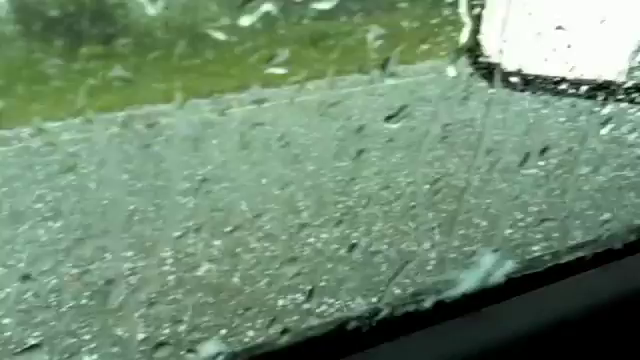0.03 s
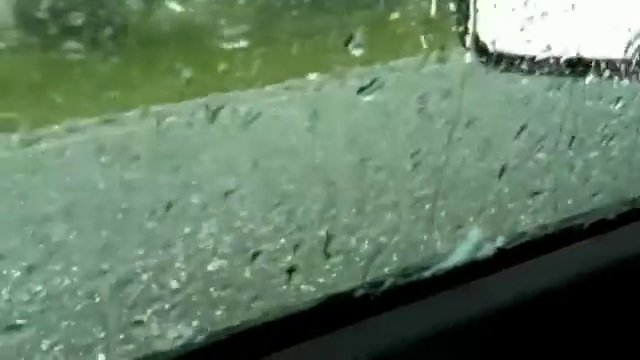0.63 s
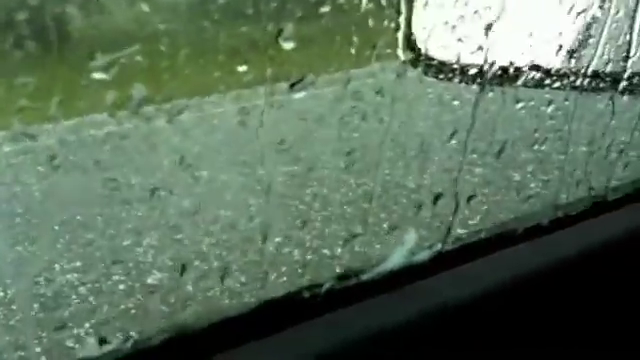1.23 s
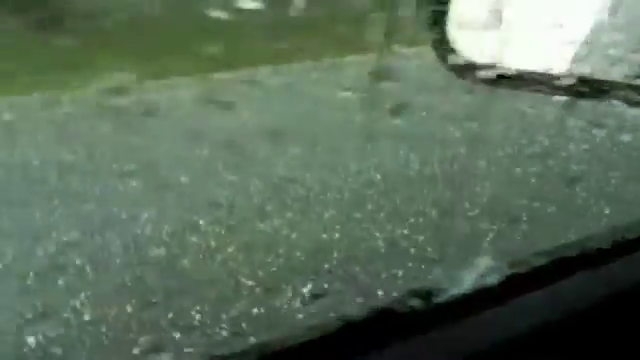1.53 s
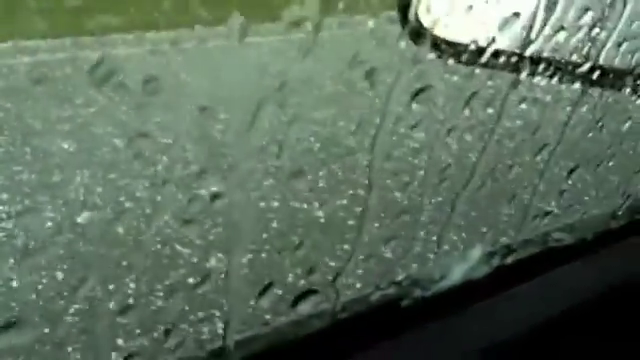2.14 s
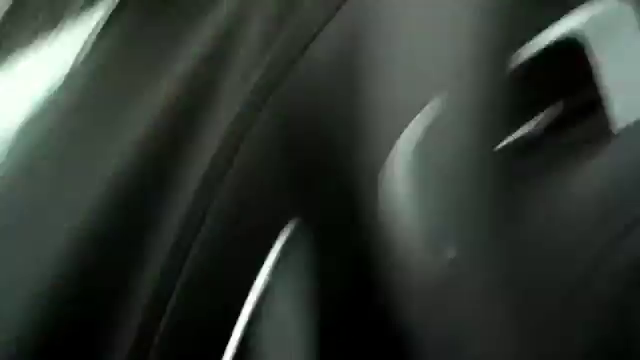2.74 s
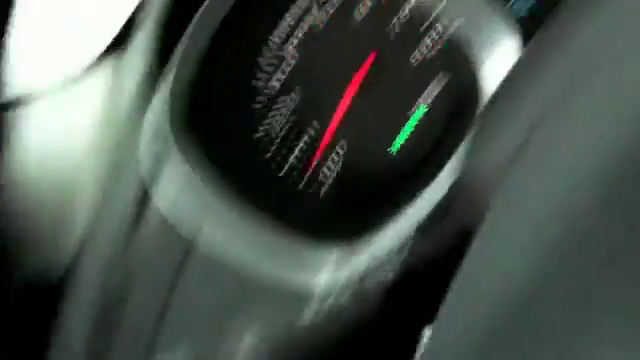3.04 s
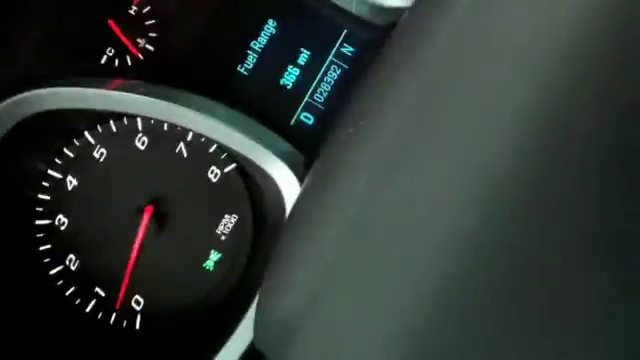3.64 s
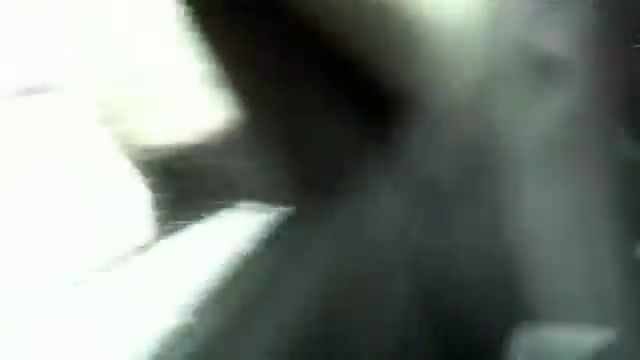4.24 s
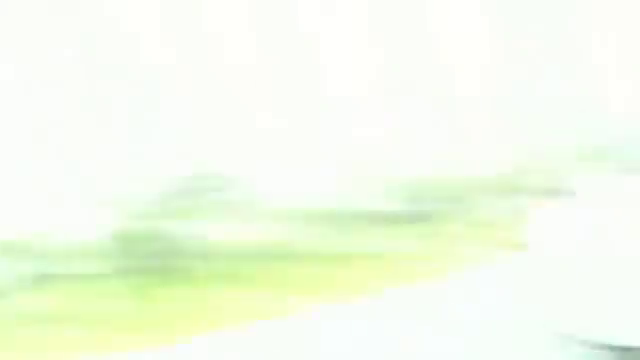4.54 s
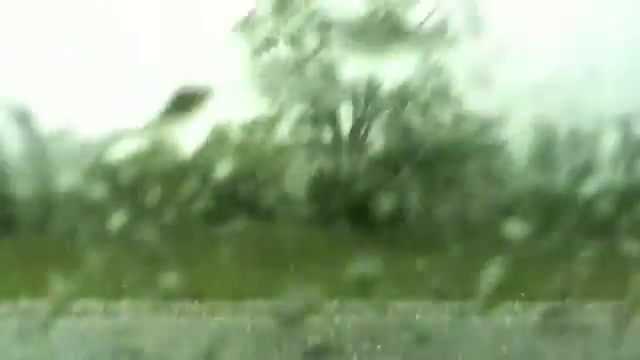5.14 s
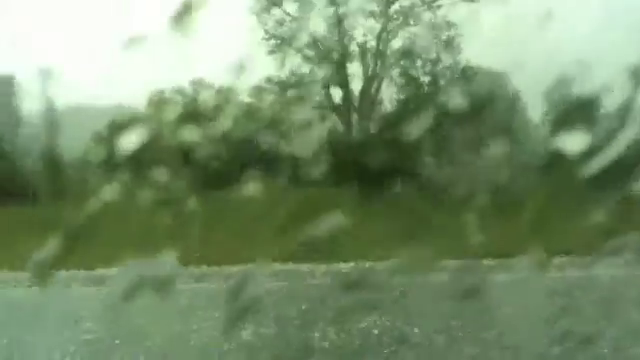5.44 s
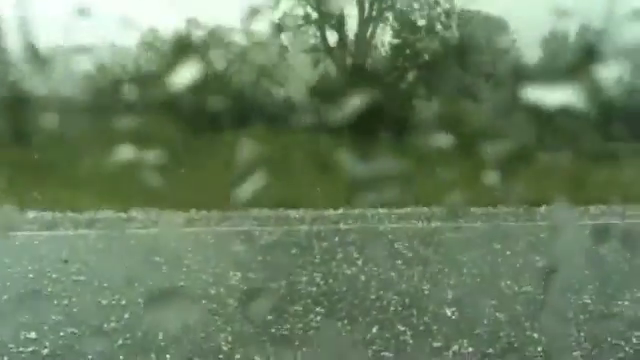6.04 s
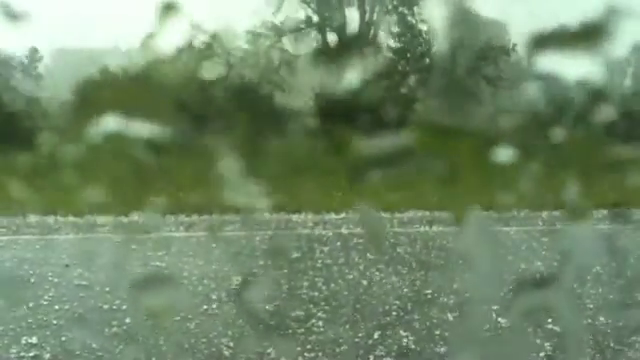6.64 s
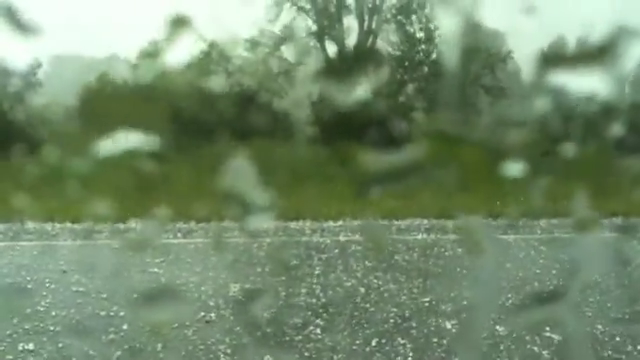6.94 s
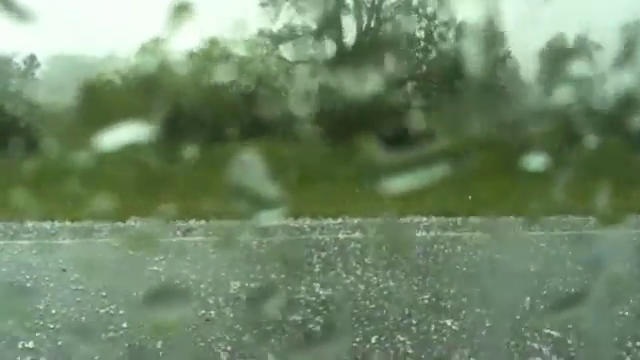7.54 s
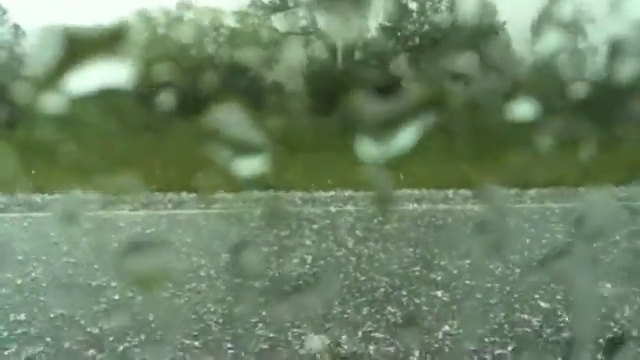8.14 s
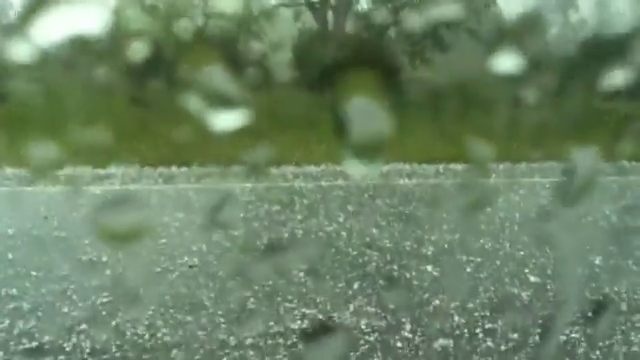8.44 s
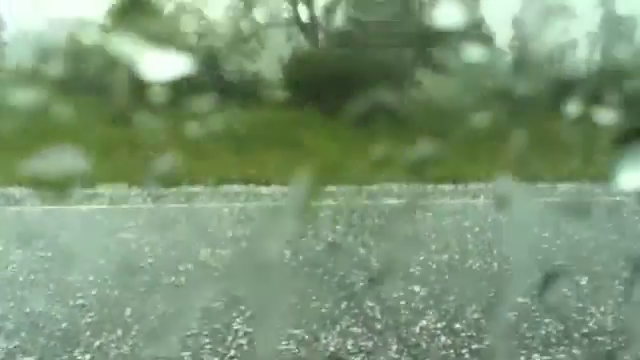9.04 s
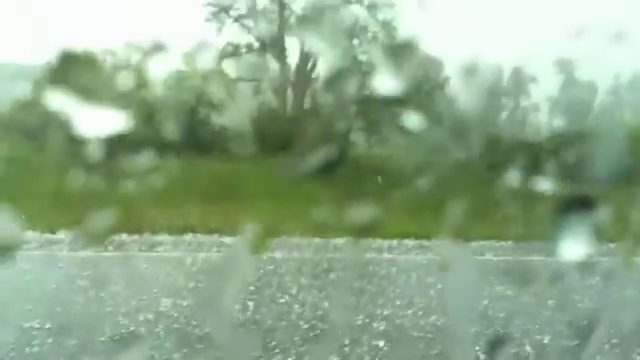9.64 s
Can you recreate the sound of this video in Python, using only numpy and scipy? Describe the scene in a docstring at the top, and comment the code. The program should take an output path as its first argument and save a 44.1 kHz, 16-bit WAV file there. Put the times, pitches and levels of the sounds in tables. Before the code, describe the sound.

Hail falls on a stopped car, heard from the driver's seat inside the closed cabin. A low, muffled wash of rain begins at about 0.1 seconds, with a faint hiss of drops and a light patter of small pellets, and stays steady throughout. From 0.2 seconds, hailstones thud and clang on the steel roof, many per second at irregular intervals, each ringing briefly with a small splash of ice. Sharp cracks and clicks from stones hitting the windows and roof cut through. Some stones shatter, and a thinner tick from a chip follows right after. Bigger stones add hollow knocks and clacks on the roof panel, scattered all the way through, with the hardest near 7.9 seconds and other strong ones around 5.8, 8.5 and 9.7 seconds. The hail keeps going until the end, at about 10 seconds.

```python
"""Hail on a stopped car, heard from the driver's seat.
A low wash of rain sets in first, with a faint hiss of drops and a patter of small pellets.
From 0.2 s on, stones thud and clang on the steel roof, spraying ice. Sharp cracks come from
stones on the windows and from the hard first click of a few roof hits.
Some stones shatter, and a chip lands just after. Big ones knock on the panel, hardest near 7.9 s."""
import sys
import numpy as np
from scipy import signal
from scipy.fft import rfft, irfft
from scipy.io import wavfile
from scipy.ndimage import uniform_filter1d

SR = 44100
rng = np.random.default_rng(int(sys.argv[2]) if len(sys.argv) > 2 else 0)


def wav_out(sig):
    """Save sig, one row per channel (or a flat mono array), as 16-bit PCM at SR to the path in sys.argv[1]."""
    wavfile.write(sys.argv[1], SR, np.round(np.clip(np.atleast_2d(sig).T, -1, 1) * 32767).astype(np.int16))


N = 431298
START_S = .122
THUD_EDGE_HZ, CRACK_EDGE_HZ = 526, 3260
SIZE = 8192  # samples per impact
T = np.arange(SIZE) / SR
HZ = np.fft.rfftfreq(SIZE, 1 / SR)


def gain_of(db):
    """Decibels to amplitude."""
    return 10 ** (np.asarray(db) / 20)


def unit_rms(x):
    """Scales to rms 1."""
    return x / np.sqrt(np.mean(x ** 2))


def decay(t60_s):
    """Falls 60 dB in t60_s."""
    return np.exp(-np.log(1000) * T / t60_s)


def curve_db(points, hz):
    """Interpolates a spectrum over log frequency."""
    point_hz, level_db = np.transpose(points)
    return np.interp(np.log(hz + 1), np.log(point_hz), level_db)


def add(mix, start_s, sound):
    """Mixes a sound in at start_s."""
    part = mix[max(round(start_s * SR), 0):][:len(sound)]
    part += sound[:len(part)]


def causal(gain):
    """Minimum-phase response: nothing sounds before the blow."""
    cepstrum = irfft(np.log(np.maximum(gain, gain_of(-100))))
    cepstrum[..., 1:SIZE // 2] *= 2
    cepstrum[..., SIZE // 2 + 1:] = 0
    return np.exp(rfft(cepstrum))


def grains(spread_db):
    """Countless tiny impacts: most faint, a few strong."""
    return rng.standard_normal(N) * gain_of(spread_db * np.minimum(rng.exponential(1, N), 5))


def lumps(depth_db, length, width):
    """Random gain, smoothed over width samples."""
    return gain_of(depth_db * unit_rms(uniform_filter1d(rng.standard_normal(length), size=width)))


# Rain spectrum inside the cabin: freq_hz, level_db
RAIN_SPECTRUM = [(60, -14.5), (160, 7.5), (450, -5.5), (1700, -14), (2800, -50), (15000, -85)]


def rain(level_db=-37):
    """Drops outside merge into a grainy wash, muffled by the cabin."""
    colour = gain_of(curve_db(RAIN_SPECTRUM, np.fft.rfftfreq(N, 1 / SR)))
    wash = irfft(rfft(grains(spread_db=3)) * colour, N)
    return gain_of(level_db) * unit_rms(wash) * (np.arange(N) > START_S * SR)


def drizzle(level_db=-56):
    """Fine drops on the windows: a faint, grainy hiss."""
    rolloff_db = -8 * np.log2(1 + HZ / CRACK_EDGE_HZ)
    colour = causal(gain_of(curve_db(SPRAY_SPECTRUM, HZ) + rolloff_db))
    hiss = signal.oaconvolve(grains(spread_db=5), irfft(colour))[:N]
    return gain_of(level_db) * unit_rms(hiss) * (np.arange(N) > START_S * SR)


# Hiss of ice breaking up: freq_hz, level_db
SPRAY_SPECTRUM = [(1500, -49), (3000, 21), (5500, 19), (8500, 16.5), (12000, 9), (15500, 7.5)]


def spray(stones, gain_db, hardness_slope, scatter_db, delay_s, rise_s, t60_s, grain_db, clump_db):
    """Harder stones burst into more fine grains, which skitter in clumps."""
    power = np.zeros(N)
    envelope = (1 - np.exp(-T / rise_s)) * decay(t60_s)
    draws = rng.standard_normal((len(stones), 2))
    for (start_s, strength_db, hardness_db), (luck, lag) in zip(stones, draws):
        gain = gain_of(gain_db + strength_db + hardness_slope * hardness_db + scatter_db * luck)
        add(power, start_s + delay_s * abs(lag), (gain * envelope) ** 2)
    clumps = lumps(clump_db, N, width=110)
    colour = causal(gain_of(curve_db(SPRAY_SPECTRUM, HZ)))
    hiss = signal.oaconvolve(grains(grain_db) * clumps, irfft(colour))[:N]
    return np.sqrt(power) * unit_rms(hiss)


# Struck car body from inside: freq_hz, level_db
BODY_SPECTRUM = [(60, -42), (100, -21.5), (160, -5), (260, -4), (460, 0.5), (750, 4), (1150, -1), (1650, 0),
                 (2250, -8), (3100, -7), (4900, -14.5), (7000, -25.5), (15500, -39.5)]


def body_bands():
    """Splits the body's response into thud, clang and crack."""
    low, not_high = (1 / (1 + (HZ / edge_hz) ** 6) for edge_hz in (THUD_EDGE_HZ, CRACK_EDGE_HZ))
    split = np.sqrt([low, (1 - low) * not_high, 1 - not_high])
    return causal(split * gain_of(curve_db(BODY_SPECTRUM, HZ)))


def panel_spot(tilt_db_per_oct, uneven_db=3, count=64):
    """Each spot favours its own modes; contact time tilts them."""
    hz = np.geomspace(HZ[1], HZ[-1], count)
    level_db = uneven_db * rng.standard_normal(count) + tilt_db_per_oct * np.log2(hz / THUD_EDGE_HZ)
    return causal(gain_of(curve_db(np.column_stack([hz, level_db]), HZ)))


def blows(stones, response):
    """Harder stones have shorter contact, so less thud. Rows: start_s, thud_db, clang_db, crack_db."""
    start_s, strength_db, hardness_db = np.transpose(stones)
    offset_db, slope = np.transpose(response)
    return np.column_stack([start_s, strength_db[:, None] + offset_db + hardness_db[:, None] * slope])


def strikes(rows, ring_t60_s, rise_s, contact, burst, burst_t60_s, cabin, grit_db):
    """Per blow: contact pulse, short burst, dense panel waves and a weak cabin echo."""
    out, bands = np.zeros(N), body_bands()
    ring, echo = decay(np.c_[ring_t60_s]), decay(np.c_[STEEL_T60_S])
    fall = np.sqrt(ring ** 2 + (burst * decay(burst_t60_s)) ** 2 + (cabin * echo) ** 2)
    brightness_db = rows[:, 3] - rows[:, 1]
    tilts_db_per_oct = .32 * (brightness_db - brightness_db.mean())
    for (start_s, *levels_db), tilt in zip(rows, tilts_db_per_oct):
        attack_speed = gain_of(levels_db[1] - rows[:, 2].mean())  # stronger clangs peak sooner
        envelope = fall * (1 - np.exp(-T / rise_s * attack_speed))
        band_norm = np.linalg.norm(envelope, axis=1, keepdims=True)
        grit = unit_rms(lumps(grit_db, SIZE, width=120))  # shattering ice roughens the ring
        drive = envelope * grit * rng.standard_normal(SIZE)
        drive[:, :1] += contact * band_norm
        sound = irfft(rfft(drive) * bands * panel_spot(tilt))
        sound *= band_norm / np.linalg.norm(sound, axis=1, keepdims=True)
        add(out, start_s, gain_of(levels_db) @ sound)
    return out


# Steel ring for thud, clang, crack: t60_s
STEEL_T60_S = [0.27, 0.17, 0.14]
# Steel response for thud, clang, crack: offset_db, hardness_slope
STEEL_RESPONSE = [(1.1, -0.73), (2.5, -0.27), (-6.5, 0.2634)]


def clangs(stones):
    """The blow spreads through the steel sheet and rings on."""
    return strikes(blows(stones, STEEL_RESPONSE), STEEL_T60_S, rise_s=.0022, contact=.2,
                   burst=1.05, burst_t60_s=.055, cabin=.14, grit_db=2.5)


# Hard-surface ring for thud, clang, crack: t60_s
HARD_T60_S = [0.045, 0.087, 0.09]


def clicks(rows):
    """Hard ice on a hard surface: a sharp click, a brief ring."""
    return strikes(rows, HARD_T60_S, rise_s=.00012, contact=.5,
                   burst=3.1, burst_t60_s=.016, cabin=.11, grit_db=2)


def pellets(count=130, strength_db=-35, hardness_db=3.5, spread_db=3):
    """Light stones drum on the roof at random."""
    start_s = rng.uniform(START_S, N / SR, count)
    traits_db = np.array([strength_db, hardness_db]) + spread_db * rng.standard_normal((count, 2))
    return clangs(np.column_stack([start_s, traits_db]))


# Chip relative to its parent stone: thud_db, clang_db, crack_db
CHIP_OFFSET_DB = [-9.5, -9, -8]


def chips(share=.54, max_hop_s=.075):
    """Some stones shatter on the roof; a thinner-sounding chip lands just after."""
    hop, luck = rng.random((len(ROOF_STONES), 2)).T
    rows = blows(ROOF_STONES, STEEL_RESPONSE)
    rows[:, 0] += max_hop_s * hop
    rows[:, 1:] += CHIP_OFFSET_DB
    return clicks(rows[luck < share])


# Big stones mid-panel: start_s, pitch_hz, level_db
BIG_STONES = [(0.239, 55, -12), (0.748, 750, 3), (0.75, 1590, 1.5), (1.048, 1575, 4.5), (1.076, 226, 3),
              (1.592, 340, -1), (2.231, 1890, -5), (2.25, 410, 5.5), (2.62, 324, 4.5), (2.939, 1124, -1.5),
              (3.227, 3100, -6.5), (3.432, 744, 6), (3.637, 530, 4.5), (4.692, 196, 5.5), (5.228, 528, 6),
              (5.743, 563, 4), (5.826, 329, 7), (6.246, 418, 6), (6.587, 1114, -1), (6.67, 1476, -5),
              (6.749, 3000, -5), (7.898, 240, 1.5), (7.94, 423, 12), (7.943, 135, 1.5), (8.214, 502, 5),
              (8.435, 404, -14), (8.539, 378, 7.5), (8.559, 553, 4), (8.697, 408, 2.5), (9.738, 410, 8)]


def knocks(t60_s=.032, rise_s=.0044, spread=.278, crowded_hz=1200, modes=7):
    """One low mode gives a hollow tonk; higher up, modes crowd into a clack. Both linger faintly."""
    out = np.zeros(N)
    envelope = np.hypot(decay(t60_s), .066 * decay(STEEL_T60_S[1])) * (1 - np.exp(-T / rise_s))
    draws = rng.uniform(-1.06, 1, (len(BIG_STONES), 2, modes))
    for (start_s, pitch_hz, level_db), (jitter, phase) in zip(BIG_STONES, draws):
        modes_hz = pitch_hz * (1 + spread * (np.linspace(-1, 1, modes) + jitter / modes))
        clack = np.sin(2 * np.pi * np.outer(T, modes_hz) + np.pi * phase).sum(1) / np.sqrt(modes)
        tonk = np.sin(2 * np.pi * pitch_hz * T)
        clack_share = pitch_hz ** 2 / (pitch_hz ** 2 + crowded_hz ** 2)
        tone = np.sqrt(1 - clack_share) * tonk + np.sqrt(clack_share) * clack
        add(out, start_s, gain_of(level_db) * envelope * tone)
    return out


def snaps(stones, gain_db=9.5, t60_s=.008, rise_s=.0003, base_hz=1850, sweep_s=.0006):
    """The surface flexes, higher under harder stones; short waves arrive first, so the pitch dives."""
    out = np.zeros(N)
    envelope = decay(t60_s) * (1 - np.exp(-T / rise_s))
    cycles = np.cumsum(base_hz * (1 + np.exp(-T / sweep_s))) / SR
    for (start_s, strength_db, hardness_db), place in zip(stones, rng.uniform(-1.07, 1, len(stones))):
        shift_oct = .025 * hardness_db + .45 * place
        flex = np.sin(2 * np.pi * cycles * 2 ** shift_oct)
        add(out, start_s, gain_of(gain_db + strength_db) * envelope * flex)
    return out


# Hard-surface response for thud, clang, crack: offset_db, hardness_slope
HARD_RESPONSE = [(1, -0.1), (5, -0.066), (-2.5, -0.083)]
# Sharp cracks: stones on the windows, and the hard first click of a few roof hits:
# start_s, strength_db, hardness_db
SHARP_CRACKS = [(0.2273, -15.5, 14), (0.403, -17.5, 3), (0.41, -13.5, 3.5), (0.487, -22.5, 25),
                (0.674, -17, 5), (1.091, -14, 2), (1.119, -17, -20), (1.304, -19, 27.5), (1.363, -19, 16),
                (1.615, -15, 16), (1.647, -11, -6.5), (1.801, -18.5, 14), (1.902, -15, 22.5),
                (1.967, -21, 12), (2.231, -22, 14), (2.339, -12.5, 6), (2.401, -15.5, 16),
                (2.446, -25.5, 21), (2.636, -26, 33), (2.8086, -18.5, 28), (3.033, -16, 30),
                (3.17, -16.5, 14), (3.19, -17.5, 19), (3.228, -23, 15), (3.321, -42, -10), (3.547, -14, 14),
                (3.685, -18.5, 15.5), (3.722, -10.5, 15.5), (3.8036, -17, 15), (3.836, -12.5, 16),
                (3.8596, -22.5, 24), (3.997, -14, 18.5), (4.158, -14.5, -6), (4.7834, -14.5, 6.5),
                (4.8812, -12, 4), (4.997, -15.5, 6), (5.072, -19.5, -5), (5.348, -18.5, 14.5),
                (5.845, -14, 14), (5.987, -18.5, 14), (6.1595, -11, 20), (6.272, -28, 28),
                (6.324, -20.5, -21), (6.3727, -17, -1), (6.501, -15.5, -26), (6.642, -18, -33),
                (6.7515, -14.5, 3), (6.864, -18.5, 0), (6.8855, -15, 7), (7.157, -16, -28),
                (7.199, -16.5, 10), (7.2676, -14.5, 11), (7.322, -16.5, 2), (7.38, -17.5, -15),
                (7.478, -18.5, 6), (7.5011, -16.5, -5), (7.738, -21, 22), (8.0629, -17.5, -28),
                (8.339, -18.5, -13), (8.384, -19, 13.5), (8.433, -17.5, -32), (8.498, -18.5, 2.5),
                (8.653, -19, 14), (8.676, -24, 27.5), (8.882, -17.5, 9), (9.152, -17, -7), (9.353, -22, 10),
                (9.378, -18, 2), (9.464, -15, 7), (9.5462, -13.5, 16), (9.5993, -12, -9)]


def sharp_cracks():
    """Hard contact on glass or roof: a click, a spit of ice and an instant snap."""
    click = gain_of(-7) * clicks(blows(SHARP_CRACKS, HARD_RESPONSE))
    spit = spray(SHARP_CRACKS, gain_db=-10, hardness_slope=.52, scatter_db=1,
                 delay_s=.0001, rise_s=.0005, t60_s=.036, grain_db=3, clump_db=3)
    return click + spit + snaps(SHARP_CRACKS)


# Stones on the roof: start_s, strength_db, hardness_db (slush below 0, hard ice above)
ROOF_STONES = [(0.215, -19.5, -1.5), (0.303, -20.5, -4), (0.373, -18.5, -3), (0.52, -18.5, -2),
               (0.556, -19, 2.5), (0.616, -20, -5), (0.666, -18.5, 0), (0.744, -19.5, 8.5),
               (0.789, -33, 27), (0.876, -19, 3), (1.01, -15.5, -2.5), (1.048, -17.5, -2.5),
               (1.194, -18.5, 1), (1.227, -19, 0), (1.303, -22.5, -9.5), (1.326, -18.5, -4.5),
               (1.357, -19, 6), (1.392, -21, 2), (1.422, -26, 1), (1.586, -23, -6), (1.732, -16.5, -2.5),
               (1.803, -16.5, -0.5), (1.856, -25, -10.5), (1.887, -17.5, 2.5), (2.14, -21.5, -10.5),
               (2.207, -16.5, -2.5), (2.25, -23, -9), (2.323, -25.5, -2), (2.378, -28, -15),
               (2.459, -18, -0.5), (2.519, -24, -1), (2.621, -20, -4), (2.659, -20.5, 2.5), (2.688, -20, 2),
               (2.755, -24, -4.5), (2.803, -23, -1), (2.883, -21.5, 2), (2.936, -23, -4),
               (3.017, -20, -4.5), (3.03, -17.5, 15), (3.068, -17, 10.5), (3.11, -18.5, -6),
               (3.15, -17.5, -2), (3.211, -18, 7), (3.319, -14, 1), (3.425, -15.5, 6), (3.617, -13, 3.5),
               (3.756, -14, 5.5), (3.892, -24.5, 0), (3.965, -26, 9), (4.065, -22, 2.5), (4.11, -23, -1),
               (4.226, -21, 3.5), (4.313, -22, -4), (4.354, -22, 1), (4.463, -18, -1.5),
               (4.513, -18.5, 5.5), (4.549, -25.5, -13.5), (4.61, -16.5, 9.5), (4.651, -21.5, -5.5),
               (4.685, -19.5, -4.5), (4.718, -22, 14), (4.755, -22, -3), (4.872, -17, 8.5),
               (4.978, -14, 3.5), (5.005, -17, -4), (5.048, -16, 1), (5.125, -19.5, 4), (5.158, -17, 4.5),
               (5.193, -17.5, 0), (5.218, -17.5, -5.5), (5.318, -16.5, 3), (5.369, -21.5, 0.5),
               (5.469, -19, 2.5), (5.489, -19.5, 4.5), (5.565, -17.5, -1), (5.685, -19, 2.5),
               (5.731, -15, 0), (5.803, -17.5, -0.5), (5.824, -19, -5.5), (5.94, -28, -2),
               (6.046, -17.5, 7), (6.095, -25.5, -7), (6.247, -19, -4), (6.42, -25.5, -1), (6.485, -18, -1),
               (6.532, -22, -4.5), (6.585, -21.5, -5.5), (6.672, -22, -1), (6.745, -20, 7),
               (6.785, -22, 3.5), (6.83, -24.5, -0.5), (6.884, -14.5, 2.5), (6.978, -21.5, -2.5),
               (7.021, -18.5, -2.5), (7.038, -17, -1.5), (7.132, -20.5, -2), (7.345, -17, 2.5),
               (7.412, -21.5, -2.5), (7.502, -22.5, 0), (7.616, -17, -5), (7.67, -18, 6.5),
               (7.779, -21.5, 2), (7.86, -23, -5), (7.936, -21, -4.5), (8.029, -21.5, 6), (8.145, -19.5, 3),
               (8.207, -17, -3), (8.237, -18.5, -3), (8.292, -23.5, -3), (8.332, -21, 4.5),
               (8.431, -20.5, -10), (8.539, -25, -8.5), (8.616, -16, -1), (8.64, -14.5, 5.5),
               (8.712, -18, -4), (8.772, -24.5, -1), (8.83, -21, 2), (8.862, -21, 2.5), (8.914, -20, -2),
               (8.985, -19.5, 3), (9.069, -20, 0.5), (9.101, -32, -17.5), (9.131, -18, -0.5),
               (9.194, -16.5, 2.5), (9.266, -22, 1.5), (9.303, -16.5, 0.5), (9.347, -14.5, 1),
               (9.378, -15, -3.5), (9.511, -22, 5), (9.632, -22.5, -5), (9.708, -16, -1.5),
               (9.729, -20.5, -4.5)]


def roof():
    """Stones ring the steel under a slower, sparkling splash of ice."""
    splash = spray(ROOF_STONES, gain_db=-15, hardness_slope=.7, scatter_db=2,
                   delay_s=.003, rise_s=.004, t60_s=.08, grain_db=3.5, clump_db=5.5)
    return gain_of(1.09) * clangs(ROOF_STONES) + splash


def scene():
    """Hail and rain in the cabin, mono."""
    hail = roof() + pellets() + sharp_cracks() + knocks() + chips()
    return (hail + rain() + drizzle())[None]


def record(dry, ceiling=.72, cutoff_hz=15900):
    """Soft clip, then low-pass."""
    rounded = dry / (1 + abs(dry / ceiling) ** 6) ** (1 / 6)
    lowpass = signal.firwin(401, cutoff_hz, window=("kaiser", 8), fs=SR)
    return signal.oaconvolve(rounded, lowpass[None], "same")


dry = scene()
out = record(dry)
wav_out(out)
```